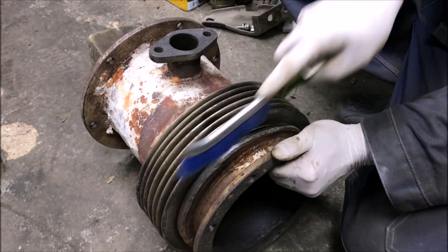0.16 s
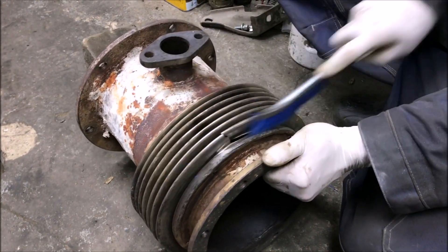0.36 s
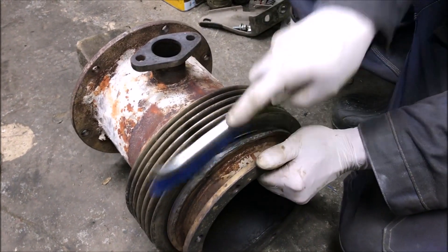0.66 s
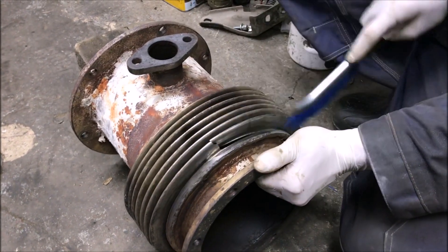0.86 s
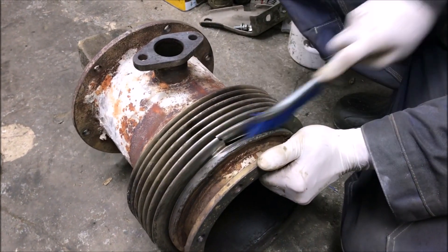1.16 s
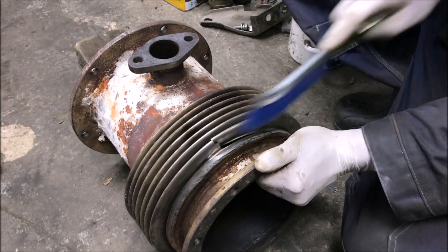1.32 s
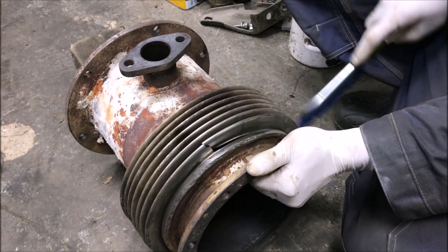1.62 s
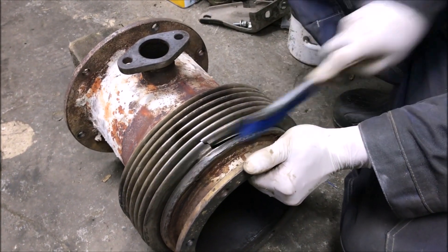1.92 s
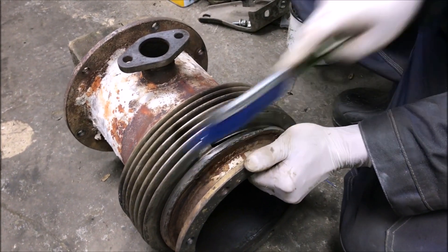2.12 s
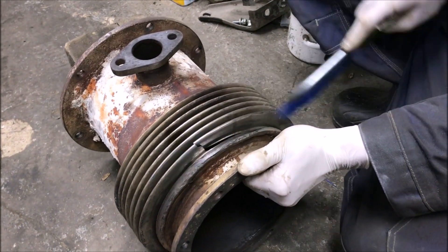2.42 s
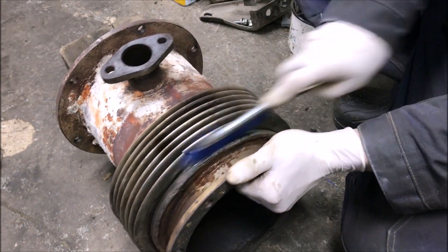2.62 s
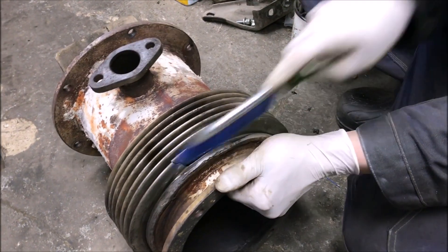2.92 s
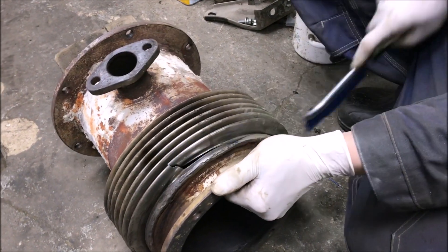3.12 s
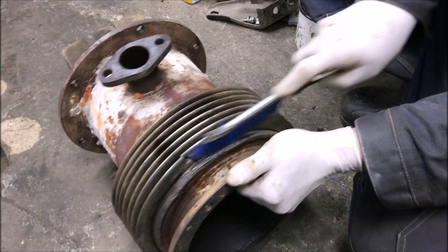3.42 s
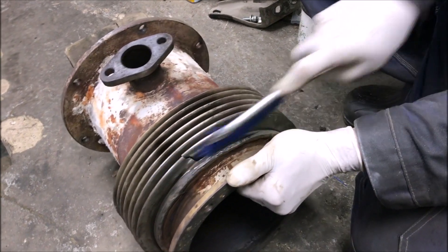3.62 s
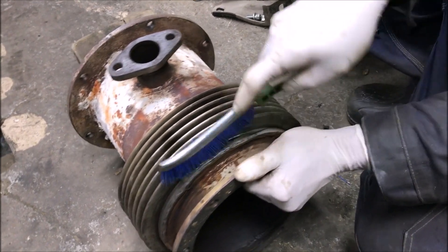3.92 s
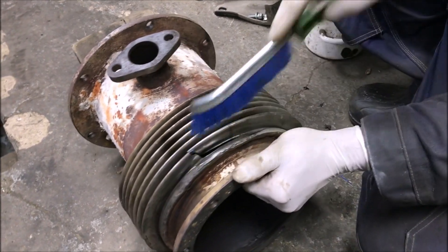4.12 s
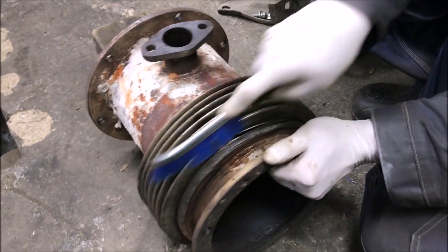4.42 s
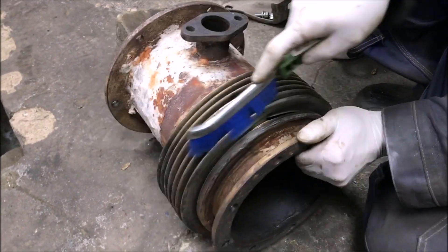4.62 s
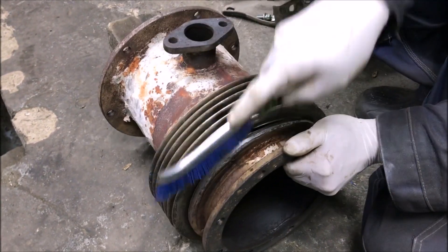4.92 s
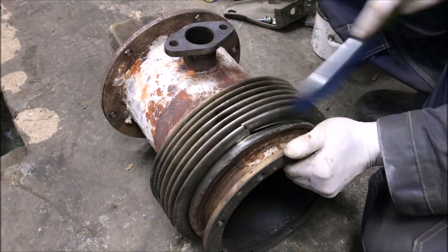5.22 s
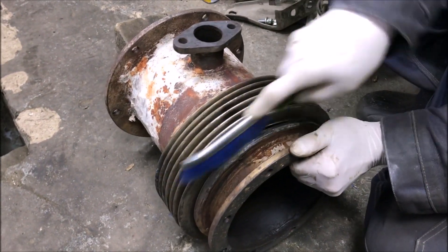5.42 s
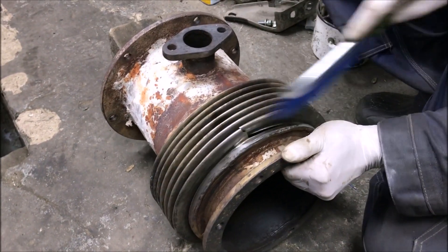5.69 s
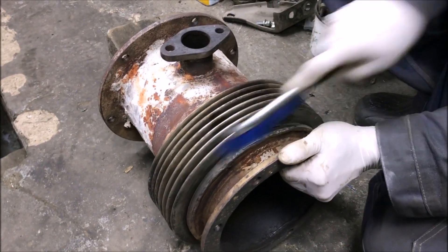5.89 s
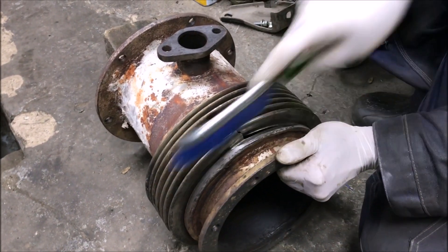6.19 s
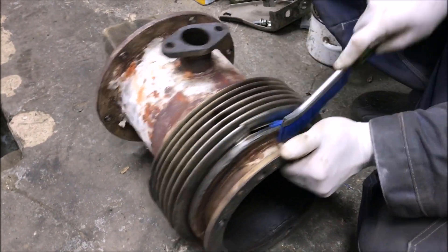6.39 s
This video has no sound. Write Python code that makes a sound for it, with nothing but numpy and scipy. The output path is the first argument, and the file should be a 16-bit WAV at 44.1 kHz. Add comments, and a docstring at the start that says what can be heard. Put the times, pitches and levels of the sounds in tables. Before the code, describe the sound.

A dull faint scuff, then a stiff brush scrubs a corrugated steel collar in short separate strokes. Each lands with a crisp slap and knock, then rasps brightly over the ribs with a brief hollow metallic ring. Tufts tick free between strokes. The pace loosens around the middle, then heavier strokes return. Close single microphone, slight workshop echo, low air noise.

```python
"""A dull scuff comes first, then a stiff hand brush is slapped onto the ribbed steel collar of a pipe fitting
and dragged along it, stroke after stroke. Bristle slips are random impulses coloured into a fizz; with
short knocks they ring decaying modes of ribs, shell, brush back and the whole fitting. Soft low bumps sound
nearby, sparse workshop echoes answer, and air noise and a low rumble lie beneath. One microphone."""
import sys
import numpy as np
from scipy import signal
from scipy.fft import rfft, irfft
from scipy.io import wavfile
from scipy.ndimage import uniform_filter1d

SR = 44100
rng = np.random.default_rng(int(sys.argv[2]) if len(sys.argv) > 2 else 0)


def dump(signal):
    """Clip the signal to [-1, 1] and save it as 16-bit WAV at the path in sys.argv[1]."""
    limited = np.clip(np.atleast_2d(signal).T, -1, 1)
    pcm = np.round(limited * 32767).astype(np.int16)
    wavfile.write(sys.argv[1], SR, pcm)


N = 288854  # samples

# strokes: (touch [s], pressing [s], dragging [s], scrub at touch [dB], at full bite [dB], at lift-off [dB],
# shell drive at touch [dB], at full bite [dB], treble boost [dB])
STROKES = [(0.382, 0.0038, 0.023, -39, -37.5, -42, -56, -49, 3.5),
           (0.416, 0.059, 0.13, -32, -21, -22.5, -45, -27.5, 1),
           (0.61, 0.032, 0.017, -64, -44.5, -45, -32, -54.5, 7),
           (0.85, 0.059, 0.088, -36, -21, -22.5, -32, -26.5, 1),
           (1.0, 0.011, 0.024, -33, -37, -38, -47, -47.5, -2),
           (1.212, 0.051, 0.12, -29, -19.5, -26, -16.5, -24, -1),
           (1.62, 0.043, .11, -32, -19, -27, -36, -23.5, -0.5),
           (1.799, 0.053, 0.0092, -38.5, -28.5, -36, -54.5, -57.5, 2),
           (1.997, 0.061, 0.1, -32.5, -20, -26.5, -38.5, -23, 0.5),
           (2.381, 0.035, 0.13, -29.5, -22.5, -22, -37.5, -23.5, 0),
           (2.771, 0.096, 0.032, -35.5, -21, -13.5, -22.5, -35.5, 0),
           (3.149, 0.043, 0.084, -43.5, -28.5, -13.5, -32, -30.5, -5),
           (3.467, 0.01, 0.14, -39.5, -37.5, -27.5, -59, -37, -4),
           (3.604, 0.024, 0.055, -56, -27, -38, -30, -30, 2.5),
           (3.728, 0.048, 0.09, -28, -25, -36.5, -48, -30.5, -0.5),
           (3.886, 0.12, 0.064, -41.5, -23, -40.5, -73, -29.5, -1),
           (4.125, 0.087, 0.054, -35, -42, -62, -66, -40, -2.5),
           (4.535, 0.074, 0.068, -34.5, -13.5, -34.5, -26, -27, -4),
           (4.719, 0.055, 0.045, -41.5, -39, -32.5, -45, -38.5, -4),
           (5.157, 0.14, 0.056, -35, -18.5, -32.5, -38.5, -26, 0.5),
           (5.598, 0.09, 0.05, -29.5, -18.5, -18, -36.5, -25.5, 0.3),
           (6.015, 0.043, 0.087, -42, -20.5, -18, -30, -25, -0.4),
           (6.432, 0.057, 0.027, -41.5, -18.5, -24.5, -29, -28, 2.5),
           (6.52, 0.02, .03, -51, -38, -39, -17, -32, -6)]
# brush landings: (time [s], slap [dB], knock into shell [dB], tap of brush back [dB], thud [dB],
# first tips brushing just ahead [dB])
LANDINGS = [(0.4004, -37, -34.5, -27.5, -40.5, -48), (0.841, -13.5, -25.5, -17.5, -32, -39),
            (1.2064, -10, -18, -9, -43, -67), (1.6055, -13.5, -31.5, -21, -46, -49),
            (1.9925, -16.5, -36, -21, -46.5, -29), (2.365, -16.5, -37.5, -16, -59, -21),
            (2.7585, -19, -21, -38.5, -34.5, -15.5), (3.1336, -17.5, -28, -17.5, -32.5, -17),
            (4.5235, -13.5, -33, -14, -47.5, -39), (5.14, -14, -24.5, -15, -35.5, -30),
            (5.5778, -18, -19, -16, -32.5, -27.5), (6.0033, -16.5, -18.5, -4, -31.5, -43),
            (6.4175, -17.5, -20.5, -10, -32.5, -51)]
# a tuft catches a rib and snaps free: (time [s], drive [dB])
SNAPS = [(0.155, -41.5), (0.177, -45), (0.2127, -50.5), (0.505, -17.5), (1.242, -18), (1.254, -11),
         (1.357, -42), (2.061, -28), (2.432, -18), (2.517, -26), (2.869, -27.5), (3.233, -38),
         (3.4823, -28.5), (3.617, -19), (3.634, -15), (3.647, -10), (3.732, -25.5), (3.9925, -17),
         (4.023, -21), (4.042, -20), (4.062, -20.5), (4.133, -25), (4.1986, -30), (4.573, -14.5),
         (4.684, -21.5), (4.692, -18.5), (4.763, -25), (5.0247, -31.5), (6.0806, -19)]
# slip noise colour: (frequency [Hz], relative density [dB per Hz])
BRISTLE_COLOUR = [(400, -12), (900, -7.5), (1800, 0.5), (2700, -1.5), (4300, 6.5), (5600, -1), (10500, -2),
                  (12400, -1), (16000, -6.5)]
# rib modes, damped by the bristles on them: (frequency [Hz], relative level [dB])
RIB_MODES = [(2130, 0), (2215, -5), (2975, -4.5), (3560, 5), (3717, 2), (3975, -8), (4210, -11), (4360, -3),
             (4565, -18.5),  (6560, -3)]
# shell modes: (frequency [Hz], relative level [dB], t60 [s])
SHELL_MODES = [(606, -9.5, 0.11), (634.2, -3.5, 0.25), (744.2, 0, 0.12), (784, -7, 0.089),
               (851.3, -4.5, 0.12), (1005, -10.5, 0.29), (1070, -12, 0.11), (1197.6, -9.5, 0.47),
               (1342, -12, 0.17), (1480, -8.5, 0.13)]
# modes of the brush back: (frequency [Hz], relative level [dB], t60 [s])
BRUSH_BACK_MODES = [(1480, -3, 0.089), (2128, -10, 0.014)]
# the whole fitting rocks on the floor: (frequency [Hz], relative level [dB], t60 [s])
THUD_MODES = [(112, -9, 0.14), (199, 1, 0.056), (311.8, 0.5, 0.095), (394, -8.5, 0.46)]
# the brush barely grazes the ribs: (start [s], length [s], level [dB])
GRAZES = [(0.0, 0.1, -41), (4.45, 0.17, -54.5)]
# graze noise colour: (frequency [Hz], relative density [dB per Hz])
SCUFF_COLOUR = [(600, -6.5), (2000, -1.5), (4500, -3.5), (7000, -14), (16000, -30)]
# dull bumps nearby: (time [s], initial level [dB], frequency [Hz], t60 [s])
BUMPS = [(1.613, -30.5, 126, 0.14), (2.289, -27, 262, 0.022)]
# workshop decay: (frequency [Hz], t60 [s])
HALL_DECAY = [(500, 0.77), (1300, 0.61), (2300, 0.43), (4000, 0.39), (10000, 0.27), (16000, 0.19)]
# air noise colour: (frequency [Hz], relative density [dB per Hz])
AIR_COLOUR = [(18, -43.5), (30, -5), (115, 2), (486, -13), (822, -14.5), (4300, -20), (9000, -30),
              (12300, -30.5), (16000, -28)]
# mean course of the low rumble: (time [s], level [dB])
RUMBLE = [(0, -86), (.2, -48.5), (.45, -57), (.6, -45.5), (.8, -54.5), (.95, -61.5), (6.55, -68)]

TOUCH_S = 0.0012
LIFT_DB_PER_S = 1292.5  # main fall once the brush lifts
STRAGGLE_DB, STRAGGLE_DB_PER_S = -28, 455  # the last bristles trail off more slowly
SHELL_SAG_DB_PER_S = 95  # the brush slides off the crown
SNAP_SHELL_DB, SNAP_RIBS_DB, SLAP_RIBS_DB = -0.5, 10.5, 4.5  # drive relative to the snap or slap
RIB_CYCLES = 95  # cycles to die by 60 dB
PITCH_WAVER = 0.011  # share of mode pitch, as hand and bristles load the steel
TREBLE_HZ = 7000
MID_HZ = 3600  # below this the scrub is the steel's own rasp and follows the shell drive
MID_SHARE, MID_DB = 0.45, 2.5  # weight of the shell drive in the mids, and its boost


def amp(db):
    """Amplitude factor of a level in dB."""
    return 10 ** (np.asarray(db) / 20)


def unit(x):
    """Scales to an RMS of 1."""
    return x / np.sqrt(np.mean(x ** 2) + 1e-20)


def read(points, hz):
    """Interpolates a table over log frequency."""
    f, value = np.transpose(points)
    return np.interp(np.log(hz + 1), np.log(f + 1), value)


def add(mix, s, sound):
    """Adds a sound in place from time s, cut at the end of the mix."""
    part = mix[round(s * SR):][:len(sound)]
    part += sound[:len(part)]


def butter(x, order, hz, kind):
    """Runs a causal Butterworth filter."""
    return signal.sosfilt(signal.butter(order, hz, kind, fs=SR, output="sos"), x)


def colour(x, spectrum):
    """Filters by a short smooth spectrum."""
    hz = np.linspace(0, SR / 2, 513)
    gain = amp(read(spectrum, hz)) * (hz < SR / 2)
    return signal.oaconvolve(x, signal.firwin2(1023, hz, gain, fs=SR), "same")


def drift(per_s):
    """Random course through unit-spread knots, per_s knots a second."""
    knots = rng.standard_normal(int(N / SR * per_s) + 2)
    return np.interp(np.arange(N) / SR * per_s, np.arange(len(knots)), knots)


def pressure():
    """Stroke gains over time of the scrub, its treble and its drive into the shell."""
    scrub, treble, shell = np.zeros((3, N))
    for (s, press_s, drag_s, touch_db, full_db, lift_db,
         shell_touch_db, shell_full_db, treble_db) in STROKES:
        t = np.arange(0, press_s + drag_s + 40 / STRAGGLE_DB_PER_S, 1 / SR)
        pressed = np.minimum(t / press_s, 1)
        dragged = np.clip((t - press_s) / drag_s, 0, 1)
        lifted_s = np.maximum(t - press_s - drag_s, 0)
        leaving_db = np.maximum(-LIFT_DB_PER_S * lifted_s, STRAGGLE_DB - STRAGGLE_DB_PER_S * lifted_s)
        contact = np.minimum(t / TOUCH_S, 1) * amp(leaving_db)
        scrub_db = touch_db + (full_db - touch_db) * pressed + (lift_db - full_db) * dragged
        gain = contact * amp(scrub_db)
        add(scrub, s, gain)
        add(treble, s, gain * (amp(treble_db) - 1))
        sag_db = SHELL_SAG_DB_PER_S * drag_s * dragged
        shell_db = shell_touch_db + (shell_full_db - shell_touch_db) * pressed - sag_db
        add(shell, s, contact * amp(shell_db))
    judder = amp(0.7 * drift(45) + 1.3 * drift(200))  # tufts grip and release unevenly
    return scrub * judder, treble * judder, shell * judder


def burst(db, rise_ms, fall_ms):
    """Gain of a quick shower of slips."""
    ms = np.arange(SR // 20) / SR * 1000
    return amp(db) * (1 - np.exp(-ms / rise_ms)) ** 2 * np.exp(-ms / fall_ms)


def landings():
    """First tips swell before each landing; a slap gain and short pushes into steel and brush follow."""
    first_tips, slap, knock, tap, push = np.zeros((5, N))
    lead_s = np.linspace(-0.012, 0, SR // 80)
    for s, slap_db, knock_db, tap_db, thud_db, tips_db in LANDINGS:
        add(first_tips, s + lead_s[0], amp(tips_db + 3000 * lead_s))
        add(slap, s, burst(slap_db, rise_ms=0.43, fall_ms=5.5))
        add(tap, s + 0.0015, amp(tap_db) * np.hanning(12))
        add(knock, s + 0.0032, amp(knock_db) * np.hanning(12))
        add(push, s + 0.0038, amp(thud_db) * np.hanning(50))
    return first_tips, slap, knock, tap, push


def snaps():
    """A tuft springs free: gains of its slip burst and of its drive into the shell."""
    snap, shell = np.zeros((2, N))
    for s, db in SNAPS:
        add(snap, s, burst(db, rise_ms=0.94, fall_ms=4.47))
        add(shell, s, burst(db + SNAP_SHELL_DB, rise_ms=1.9, fall_ms=1.5))
    return snap, shell


def slips(per_s, spread_db):
    """Bristle tips let go at random moments, most faintly, a few hard."""
    size_db = spread_db * np.minimum(rng.exponential(1, N), 5)
    size = amp(size_db) * rng.standard_normal(N)
    return unit(size * (rng.random(N) < per_s / SR))


def patchy(x, patch_db):
    """Tufts of differing length come and go: colour shifts in patches about 1.5 kHz by 20 ms."""
    z = signal.stft(x, nperseg=256, noverlap=192)[2]
    field = uniform_filter1d(rng.standard_normal(z.shape), size=9, axis=0)
    field = unit(uniform_filter1d(field, size=14, axis=1))
    return unit(signal.istft(z * amp(patch_db * field), nperseg=256, noverlap=192)[1][:N])


def ring(force, modes, shift_db, shift_per_s):
    """Each mode decays by its t60; pitch wavers, and its reach changes as the brush moves along."""
    out = np.zeros(N)
    for hz, db, t60_s in modes:
        phase = 2 * np.pi * np.cumsum(hz * (1 + PITCH_WAVER * drift(25))) / SR
        turn = np.exp(1j * phase)
        r = amp(-60 / t60_s / SR)  # decay per sample
        reach = amp(db + shift_db * np.tanh(drift(shift_per_s)))
        envelope = signal.lfilter([1], [1, -r], force * reach / turn)
        out += np.sqrt(2 * (1 - r ** 2)) * (turn * envelope).imag
    return butter(out, 4, 0.85 * modes[0][0], "high")  # little radiates under the lowest mode


def fitting():
    """Strokes, slaps and snaps gate bristle noise and drive the modes of steel and brush back."""
    scrub, treble, shell = pressure()
    first_tips, slap, knock, tap, push = landings()
    snap, snap_shell = snaps()
    scrub = scrub + first_tips
    shell = shell + snap_shell
    mids = scrub ** (1 - MID_SHARE) * (amp(MID_DB) * shell) ** MID_SHARE

    tips = slips(per_s=16000, spread_db=1.1)
    crackle = slips(per_s=500, spread_db=1.5)  # single stiff bristles spring loose
    fizz = patchy(colour(tips + amp(-13) * crackle, BRISTLE_COLOUR), patch_db=2.4)
    top = butter(fizz, 2, TREBLE_HZ, "high")
    low = signal.sosfiltfilt(signal.butter(2, MID_HZ, fs=SR, output="sos"), fizz)
    hiss = (scrub + snap + slap) * fizz + treble * top + (mids - scrub) * low

    grit = tips + amp(-5) * crackle
    jolt = amp(SNAP_RIBS_DB) * snap + amp(SLAP_RIBS_DB) * slap
    ribs = [(hz, db, RIB_CYCLES / hz) for hz, db in RIB_MODES]
    high_ribs = [mode for mode in ribs if mode[0] > MID_HZ]
    low_ribs = [mode for mode in ribs if mode[0] <= MID_HZ]
    rasp = ring((scrub + jolt) * grit, high_ribs, shift_db=6.5, shift_per_s=22)
    rasp += ring((mids + jolt) * grit, low_ribs, shift_db=6, shift_per_s=10)

    shell_force = shell * tips
    body = ring(amp(-12) * shell_force + knock, SHELL_MODES, shift_db=6, shift_per_s=12)
    back = ring(tap, BRUSH_BACK_MODES, shift_db=3, shift_per_s=4)
    thud = ring(push + amp(-32.5) * shell_force, THUD_MODES, shift_db=3, shift_per_s=3)
    return hiss + body + back + amp(-21) * rasp + thud


def grazes():
    """Light slips make dull noise that fades as the brush drifts off."""
    gain = np.zeros(N)
    for s, length_s, db in GRAZES:
        along = np.linspace(0, 1, round(length_s * SR))
        add(gain, s, np.minimum(10 * along + 0.3, 1) * amp(db - 14 * along))
    return gain * patchy(colour(slips(per_s=8000, spread_db=1), SCUFF_COLOUR), patch_db=3)


def bumps():
    """Decaying low sines, a dull bump each."""
    t, out = np.arange(SR // 8) / SR, np.zeros(N)
    for s, db, hz, t60_s in BUMPS:
        add(out, s, amp(db - 60 * t / t60_s) * np.sin(2 * np.pi * hz * t))
    return out


def workshop(x):
    """Sparse random-sign echoes, each band with its own decay; three sets take turns nine times a second."""
    at, out = np.arange(400, SR - 20, 20), np.zeros(N)
    for k in range(3):
        taps = np.zeros(SR)
        taps[at + rng.integers(0, 20, len(at))] = rng.choice([-1., 1.], len(at))
        hz, t, z = signal.stft(taps, SR, nperseg=256)
        decay = amp(-60 * t / read(HALL_DECAY, hz)[:, None])
        tail = signal.istft(z * decay, SR, nperseg=256)[1]
        share = np.sqrt(2 / 3) * np.cos(np.pi * (9 * np.arange(N) / SR + k / 3))
        out += signal.fftconvolve(x * share, tail / np.linalg.norm(tail))[:N]
    return out


def air():
    """Steadily coloured noise whose level wavers slowly."""
    hz = np.fft.rfftfreq(N, 1 / SR)
    noise = unit(irfft(rfft(rng.standard_normal(N)) * amp(read(AIR_COLOUR, hz)), N))
    return amp(-57.5 + 1.2 * drift(2.3)) * noise


def rumble():
    """Noise in a broad hump about 60 Hz, with a lumpy level."""
    hz = np.fft.rfftfreq(N, 1 / SR)
    hump = np.exp(-(np.log(hz / 60 + 1e-9) / 0.85) ** 2)
    noise = unit(irfft(rfft(rng.standard_normal(N)) * hump, N))
    s, db = np.transpose(RUMBLE)
    return amp(np.interp(np.arange(N) / SR, s, db) + 1.5 * drift(36)) * noise


def scene():
    """Near sounds, their echoes and the background, alike in both channels."""
    near = fitting() + grazes() + bumps()
    mono = near + amp(-14.5) * workshop(near) + air() + rumble()
    return np.array([mono, mono])


def record(dry):
    """The small microphone loses the deepest bass; then the band limit."""
    thinned = butter(dry, 4, 42, "high")
    band_limit = signal.firwin(511, 15900, window=("kaiser", 9), fs=SR)
    return signal.oaconvolve(thinned, band_limit[None], "same")


dry = scene()
out = record(dry)
dump(out)
```